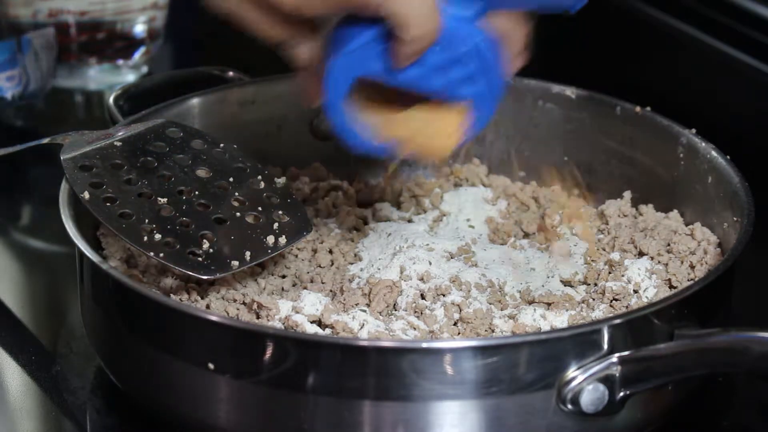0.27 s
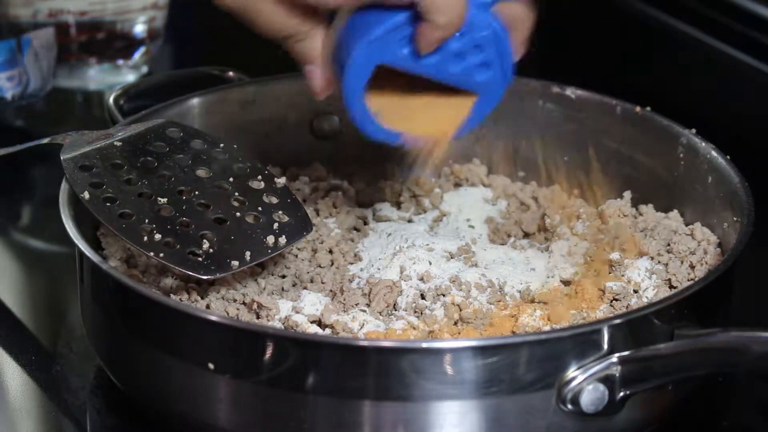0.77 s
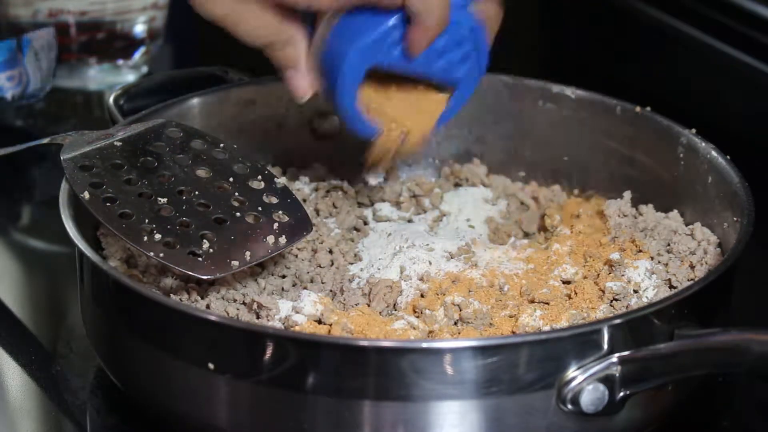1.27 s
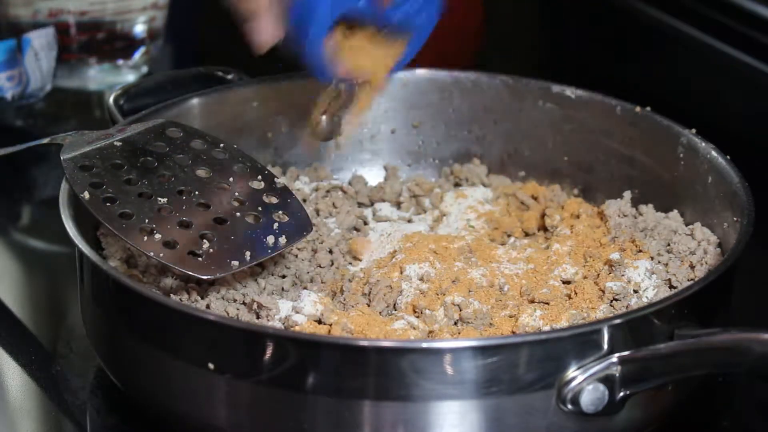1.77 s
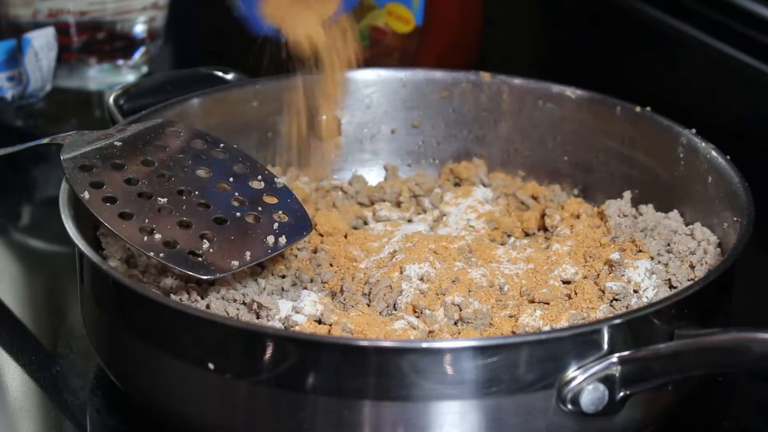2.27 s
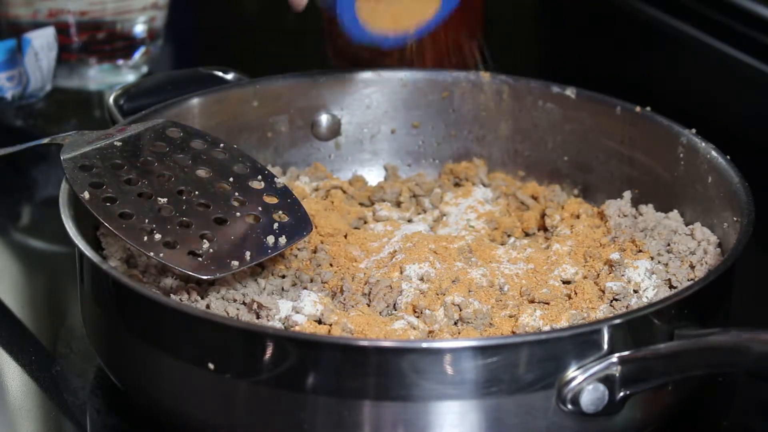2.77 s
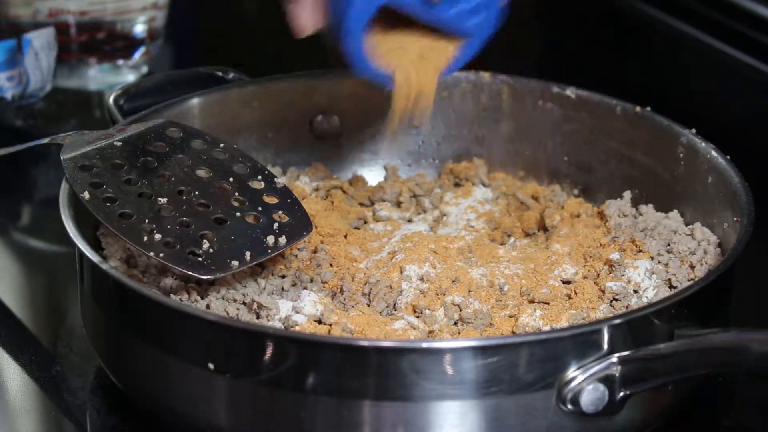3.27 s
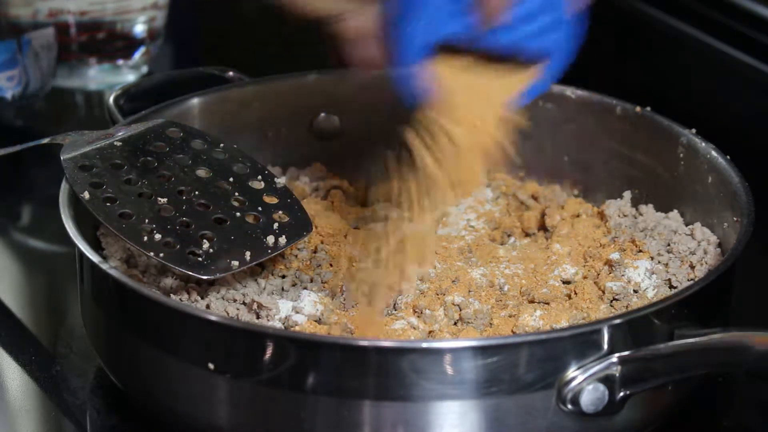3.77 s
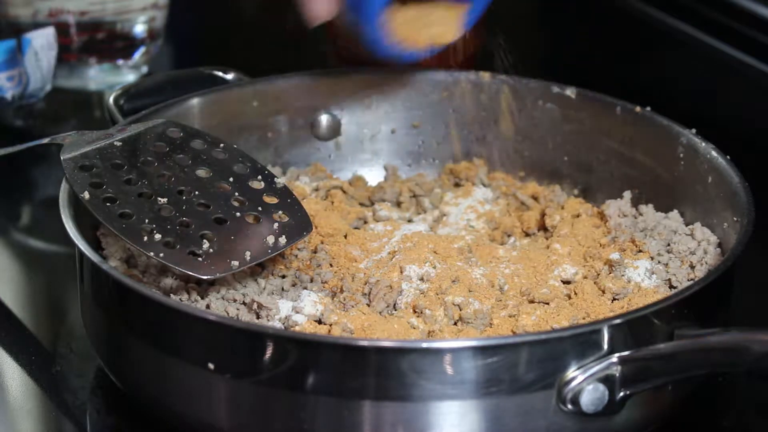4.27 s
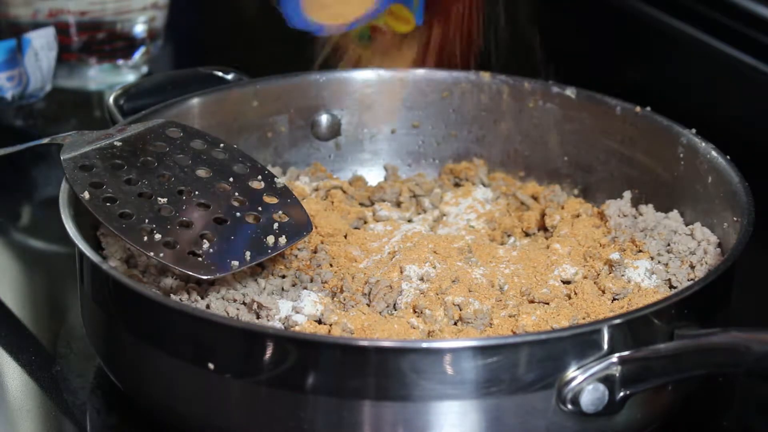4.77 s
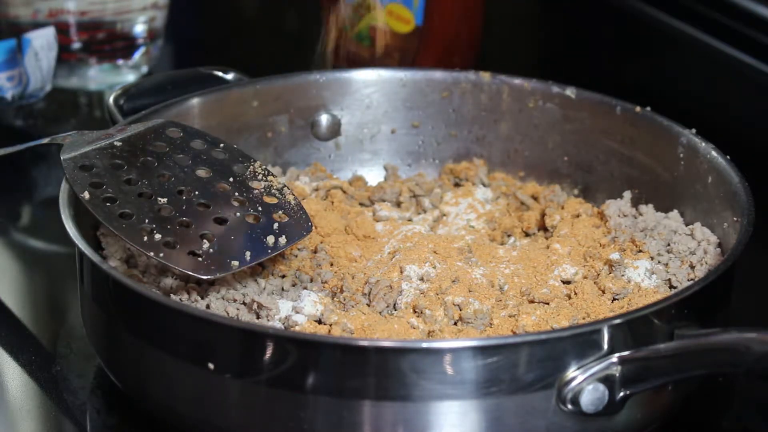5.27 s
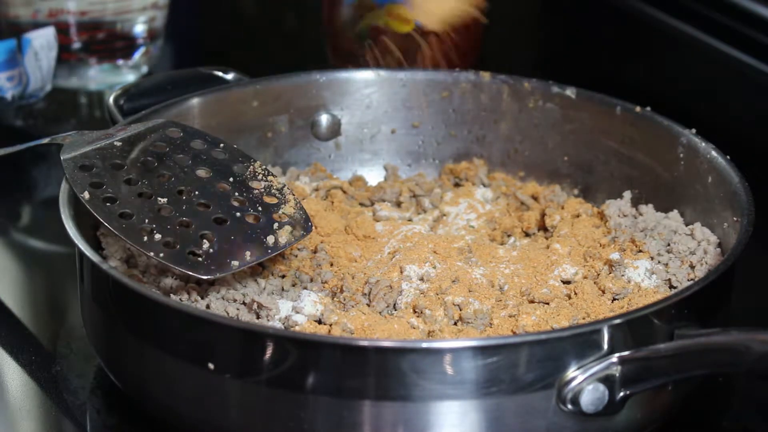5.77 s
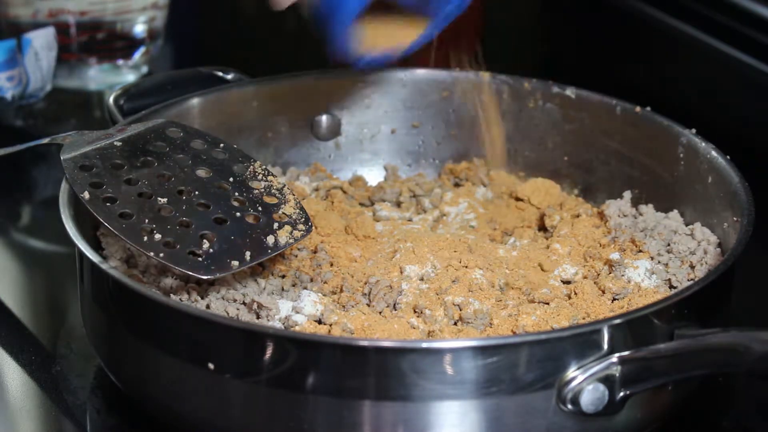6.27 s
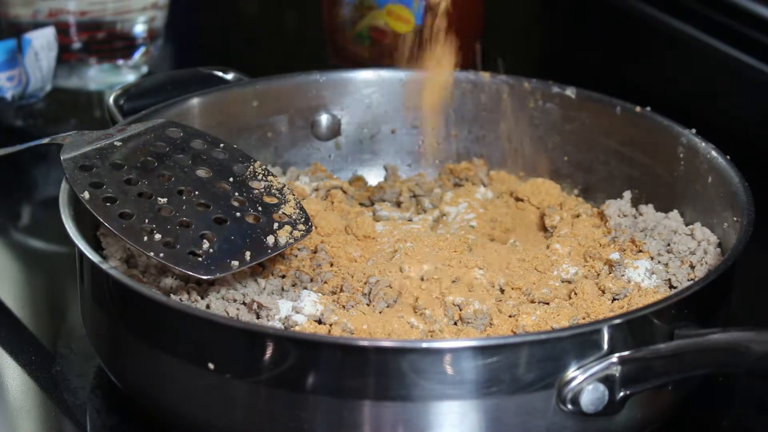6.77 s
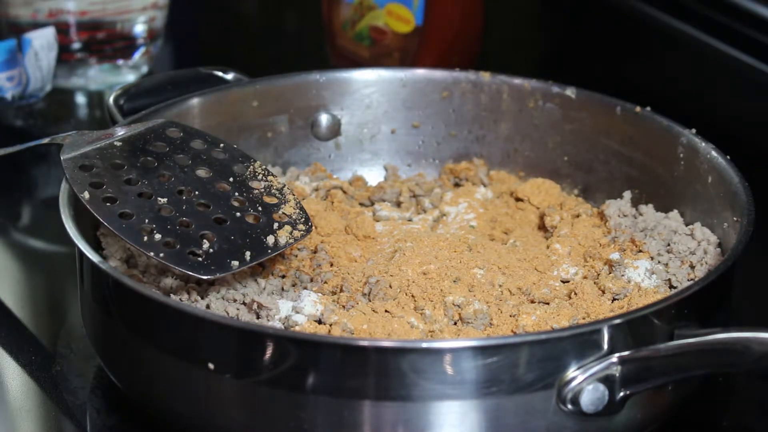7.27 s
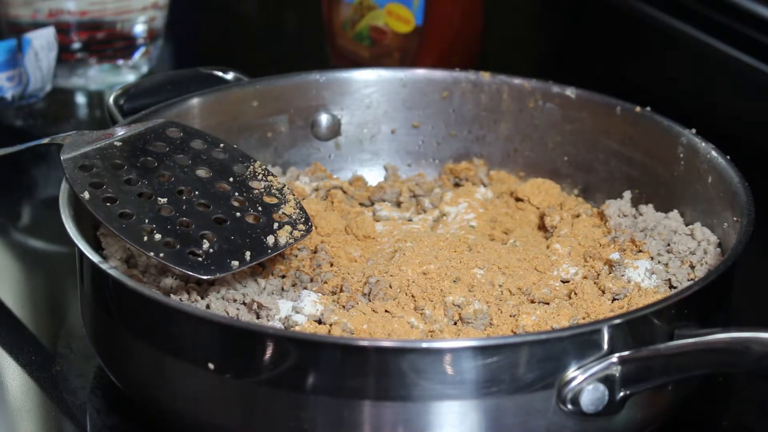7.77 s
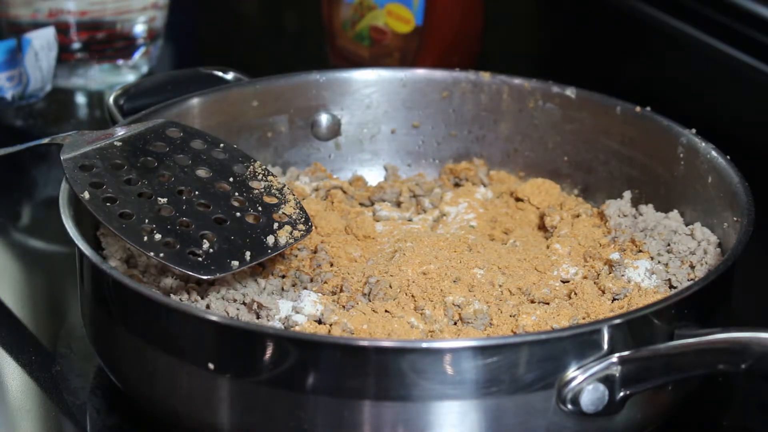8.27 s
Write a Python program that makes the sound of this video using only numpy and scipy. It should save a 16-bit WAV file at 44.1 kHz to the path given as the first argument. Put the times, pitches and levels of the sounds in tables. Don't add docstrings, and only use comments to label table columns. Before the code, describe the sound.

Throughout, a quiet kitchen hums low with slowly beating appliance tones, soft air rumble and faint hiss. It opens with a few hollow finger taps on plastic, and from 0 to 2.3 s a jar of dry powder is flicked about four times a second, each flick a paired swish, out and back, grainy with a fine high fizz. A sharp fingernail knock lands at 1.4 s, small clicks at 2.5 s. After a short lull, shaking resumes from 2.8 to about 6.1 s, gradually softer. From 6.3 to 6.8 s come looser slips of powder and gritty clicks. Between 7.1 and 7.9 s fingers fumble, tapping and scuffing the plastic. At 8.1 s the lid snaps shut with abrupt loud cracks, the pan rings faintly and the background briefly dips. Soft low thuds at 8.2 to 8.5 s set the jar on a hollow counter, amid rubbing. Close microphone, short room echo.

```python
import sys
import numpy as np
from scipy import signal
from scipy.io import wavfile
from scipy.ndimage import uniform_filter1d

SR = 44100
rng = np.random.default_rng(int(sys.argv[2]) if len(sys.argv) > 2 else 0)


def int16_out(signal):
    q = np.round(np.clip(np.atleast_2d(signal).T, -1, 1) * 32767)
    wavfile.write(sys.argv[1], SR, q.astype(np.int16))


def convert_level_to_amplitude(level_db):
    exponent = np.asarray(level_db, float) / 20
    return 10 ** exponent


N = 376173


def evened(x):
    return x / np.sqrt(np.mean(x ** 2) + 1e-20)


def read(points, hz):
    f, value = np.transpose(points)
    return np.interp(np.log(hz + 1), np.log(f + 1), value)


def add(mix, start_s, sound):
    part = mix[round(start_s * SR):][:len(sound)]
    part += sound[:len(part)]


def resonate(x, hz, width_hz):
    q = max(hz / width_hz, .3)
    return signal.lfilter(*signal.iirpeak(min(hz, .45 * SR), q, SR), x)


def resonate_twice(x, hz, width_hz):
    return resonate(resonate(x, hz, width_hz), hz, width_hz)


def ring(modes, seconds, soft_s=0.0009, sag=0):
    t = np.arange(round(seconds * SR)) / SR
    bent = t + sag * 0.019 * (1 - np.exp(-t / 0.017))
    tones = sum(convert_level_to_amplitude(db - 60 * t / t60) * np.sin(2 * np.pi * hz * bent) for hz, db, t60 in modes)
    return (1 - np.exp(-t / soft_s)) * tones


def noise(spectrum, patchy_db, channels=1):
    hz = np.fft.rfftfreq(2048, 1 / SR)
    real, imag, patches = rng.standard_normal((N // 512 + 5, 1025, channels, 3)).T
    patches = uniform_filter1d(patches, 20, 1)
    patches = evened(uniform_filter1d(patches, 6, 2))
    z = (real + 1j * imag) * convert_level_to_amplitude(read(spectrum, hz)[:, None] + patchy_db * patches)
    return evened(signal.istft(z, nperseg=2048, noverlap=1536)[1][:, :N])


# pitch in Hz, rms level in dB, start phase in turns.
HUM_TONES = [(60.0, -56.5, .3), (59.17, -61.5, 0), (120, -67, .1), (118.34, -66, .4), (153.8, -64, .2),
             (205.1, -56, .3), (354.9, -61, .1), (359.9, -64, .7)]


def hum():
    t = np.arange(N) / SR
    return sum(np.sqrt(2) * convert_level_to_amplitude(db) * np.cos(2 * np.pi * (hz * t + turns)) for hz, db, turns in HUM_TONES)


# frequency in Hz, density in dB per Hz.
AIR_SPECTRUM = [(15, -55), (25, -35), (49, 0), (72, -8.5), (87, -32), (110, -11.5), (180, -4.5), (330, -2),
                (480, -4), (680, -8.5), (1000, -10), (1330, -10), (1600, -16), (4500, -25), (16000, -42.5)]


def air():
    return convert_level_to_amplitude(-46.5) * noise(AIR_SPECTRUM, patchy_db=-0.15)[0]


# frequency in Hz, density in dB per Hz.
HISS_SPECTRUM = [(18, -31), (30, -3.5), (1130, -10.5), (1320, -11), (1810, -7), (5310, -7.5), (16000, -8)]


def hiss():
    return convert_level_to_amplitude(-55.5) * noise(HISS_SPECTRUM, patchy_db=1.5, channels=2)


# start in seconds, peak in dB, ring in Hz, rub in dB above the ring.
TAP_EVENTS = [(.017, -35, 480, -17), (.032, -33, 513, -11), (.058, -36, 500, -10), (.096, -34, 510, -16),
              (0.097, -40.5, 1720, -3), (0.601, -43, 2660, -5), (1.41, -38, 550, -9), (2.543, -37, 504, -9),
              (6.276, -41.5, 483, 5), (6.532, -32, 530, -21), (6.71, -42, 1370, 1.5),
              (6.599, -41, 2240, -11), (7.266, -41, 870, 1), (7.27, -38, 1820, -6), (7.331, -43.5, 900, 4),
              (7.401, -36.5, 1090, 2.5), (7.403, -41, 1800, -2.5), (7.485, -39.5, 910, 1),
              (7.487, -28, 1685, -17), (7.55, -35.5, 930, -3), (7.629, -37, 990, 1.5),
              (7.631, -37, 1640, -4), (7.704, -39, 442, -1), (7.803, -35, 1470, -9), (7.92, -41, 1500, -5)]


def taps():
    out, t = np.zeros(N), np.arange(2500) / SR
    t60 = .03
    grits = rng.standard_normal((len(TAP_EVENTS), 2500))
    for (s, db, hz, rub_db), grit in zip(TAP_EVENTS, grits):
        modes = [(hz, -1, t60), (1.15 * hz, -4, 1.3 * t60), (1.33 * hz, -5, 0.078 * t60)]
        rub = evened(resonate_twice(grit, hz, hz)) * convert_level_to_amplitude(rub_db - 60 * t / (2.1 * t60))
        add(out, s, convert_level_to_amplitude(db) * (ring(modes, 2500 / SR) + rub))
    return out


# frequency in Hz, t60 in seconds.
ROOM_T60 = [(300, 1), (1500, 0.38), (4000, 0.42), (9000, 0.35), (15000, 0.32)]


def kitchen(x):
    echoes = np.zeros(SR)
    at = np.arange(200, SR - 20, 20)
    echoes[at + rng.integers(0, 20, len(at))] = rng.choice([-1., 1.], len(at))
    hz, t, z = signal.stft(echoes, SR, nperseg=256)
    decay = convert_level_to_amplitude(-60 * t / read(ROOM_T60, hz)[:, None])
    tail = signal.istft(z * decay, SR, nperseg=256)[1]
    return signal.fftconvolve(x, tail / np.linalg.norm(tail))[:N]


# out stroke in seconds, lag of the return in seconds, out in dB, return in dB.
SHAKE_EVENTS = [(0.037, 0.11, -49.5, -49), (.277, 0.096, -54.5, -56), (.521, .114, -55, -49.5),
                (.772, 0.1, -51, -52), (.999, .096, -53, -47.5), (1.244, 0.1, -55.5, -55.5),
                (1.482, 0.1, -53, -52.5), (1.718, 0.1, -56.5, -54), (1.937, 0.096, -57, -61),
                (2.177, 0.062, -61, -63), (2.804, 0.084, -56.5, -55), (3.03, 0.1, -58.5, -53),
                (3.26, 0.086, -51.5, -54), (3.451, .097, -55, -54), (3.66, 0.12, -54, -52.5),
                (3.913, 0.09, -56.5, -56), (4.125, 0.088, -52.5, -52.5), (4.322, 0.097, -56.5, -54),
                (4.55, 0.091, -59, -51.5), (4.742, 0.12, -58, -57), (4.974, 0.066, -66, -65),
                (5.303, 0.1, -56.5, -65), (5.51, 0.14, -58, -64), (5.747, .142, -55, -72),
                (5.993, .107, -58.5, -60.5)]
# time in seconds, share in dB.
WALL_SHARE = [(0, -2), (.3, 4.5), (.75, -5), (.9, 1), (1.1, -6), (1.3, 2.5), (1.55, -4.5), (2.05, 4),
              (2.85, -9), (3.1, -5.5), (3.35, 1), (3.9, -1.5), (4.2, -2), (4.6, -4), (4.8, -3), (5.3, 2.5),
              (5.75, 0), (6.1, -6)]
# centre in seconds, level in dB, wall share in dB,
# width in seconds.
SLIP_EVENTS = [(.4, -56, 0, 0.11), (1.882, -51, -14, 0.035), (2.56, -58, 0, 0.044), (2.727, -56.5, -4, .08),
               (3.88, -63.5, 10, 0.043), (4.74, -66, 7, .035), (6.04, -62.5, 3, 0.018),
               (6.295, -52.5, -9, 0.038), (6.46, -56, -5, 0.058), (6.505, -58, -4, .05),
               (6.536, -57, -3, .034), (6.625, -51, 3, .05), (6.715, -49, -9, 0.057),
               (6.755, -53.5, -13, .05), (7.083, -56, -8, 0.027), (7.215, -55.5, 1, 0.052),
               (7.269, -57.5, 6.5, 0.039), (7.332, -57.5, 1, 0.044), (7.397, -55, 0, .04),
               (7.565, -57.5, 9, 0.037), (7.62, -58, 0, .05), (7.667, -57, -1, .057), (7.71, -66, -8, .05),
               (7.758, -63, -8, .032), (7.808, -61, 0, .04), (8.07, -56, -6, .031), (8.36, -58.5, 8.5, .04),
               (8.41, -60.5, 10, 0.055)]


def strokes():
    out_width_s, return_width_s = 0.049, 0.055
    return_wall_db = 2.5
    out_s, lag_s, out_db, return_db = np.transpose(SHAKE_EVENTS)
    when, wall_db = np.transpose(WALL_SHARE)
    out = [(s, db, np.interp(s, when, wall_db), out_width_s) for s, db in zip(out_s, out_db)]
    back = [(s, db, np.interp(s, when, wall_db) + return_wall_db, return_width_s)
            for s, db in zip(out_s + lag_s, return_db)]
    return [*out, *back, *SLIP_EVENTS]


def grains(per_s, spread_db):
    hit, size, sign = rng.random((N, 3)).T
    return (hit < per_s / SR) * convert_level_to_amplitude(-spread_db * np.log(size + 0.0092)) * np.sign(sign - .5)


# centre in Hz, width in Hz, level in dB.
HEAP_BODY = [(1500, 3200, 12), (2800, 3900, 6), (4000, 2100, -1.5), (7000, 4300, -23)]
# centre in Hz, width in Hz, level in dB.
JAR_BODY = [(5250, 3800, -8), (5540, 1100, 2), (6640, 6100, -19)]
# centre in Hz, width in Hz, level in dB.
FIZZ_BODY = [(9500, 1900, 8), (10840, 1800, 4.5), (12400, 5000, 6)]


def rustle(body, per_s, trim_db):
    powder = grains(per_s, spread_db=4.0)
    colour = sum(convert_level_to_amplitude(db) * resonate_twice(powder, hz, 1.34 * width_hz) for hz, width_hz, db in body)
    return convert_level_to_amplitude(trim_db) * evened(colour)


def shaking():
    t = np.arange(0, N, 32) / SR
    lean = 0.83
    power = 1e-10
    for s, db, wall_db, width_s in strokes():
        u = (t - s) / width_s
        rush = np.exp(-2.8 * np.where(u < 0, u / lean, u) ** 2)
        fizz_db = -4.5 + 0.81 * wall_db
        power = power + rush * convert_level_to_amplitude(2 * (db + np.array([[0], [wall_db], [fizz_db]])))
    heap, jar, fizz = [np.interp(np.arange(N) / SR, t, level) for level in np.sqrt(power)]
    out = heap * rustle(HEAP_BODY, per_s=4000, trim_db=1.5)
    out += jar * rustle(JAR_BODY, per_s=3500, trim_db=-2.5)
    return out + fizz * rustle(FIZZ_BODY, per_s=4000, trim_db=.3)


def bursts(rows, rise_s, spread):
    out, t = np.zeros(N), np.arange(9000) / SR
    for (s, db, hz, t60), grit in zip(rows, rng.standard_normal((len(rows), 9000))):
        burst = evened(resonate_twice(grit, hz, spread * hz))
        add(out, s, burst * convert_level_to_amplitude(db - 60 * t / t60) * np.minimum(t / rise_s, 1))
    return out


# start in seconds, starting rms in dB, centre in Hz, t60 in seconds.
CLICK_EVENTS = [(.361, -41, 6000, .04), (1.409, -42, 6000, 0.023), (2.543, -40.5, 6000, 0.047),
                (2.544, -46, 2500, .03), (2.605, -44, 8000, .015), (2.68, -47.5, 5000, .04),
                (3.063, -44, 3500, 0.024), (4.548, -42.5, 4000, .03), (4.733, -47, 12000, .08),
                (6.275, -36, 2300, .022), (6.276, -45, 6000, .036), (6.508, -45, 5000, 0.027),
                (6.532, -39.5, 2500, .027), (6.533, -41.5, 6500, 0.036), (6.599, -45, 6000, .04),
                (6.7105, -33, 3300, .02), (7.074, -49, 4000, .04), (7.396, -42, 4500, .027),
                (7.4, -44, 2100, 0.027), (7.486, -51, 2200, 0.027), (7.551, -46, 5000, .04),
                (7.664, -37.5, 9500, .012), (7.669, -42, 10000, .043), (7.703, -39, 3500, .013),
                (7.755, -38.5, 3500, .018), (7.803, -40, 2200, .02), (8.278, -40, 9000, .012),
                (8.298, -37, 9500, .012), (8.311, -42, 8000, .012)]


def clicks():
    return bursts(CLICK_EVENTS, rise_s=0.00083, spread=1.15)


# start in seconds, peak in dB.
NAIL_KNOCK = (1.4097, -18)
# pitch in Hz, level in dB, t60 in seconds.
SHELL_MODES = [(1685, 0, .021), (1960, 3, .009), (2300, -3, .007)]


def nail_knock():
    out = np.zeros(N)
    start_s, peak_db = NAIL_KNOCK
    add(out, start_s, convert_level_to_amplitude(peak_db) * ring(SHELL_MODES, .06))
    return out


# start in seconds, starting rms in dB, centre in Hz, t60 in seconds.
SCUFF_EVENTS = [(1.42, -47.5, 1900, 0.18), (7.165, -40, 350, 0.12), (7.37, -38, 350, 0.2),
                (7.27, -50, 1500, 0.96), (7.402, -46.5, 1390, .65), (7.49, -42, 1370, .38),
                (7.555, -48.5, 1300, .61), (7.635, -45.5, 1500, 1), (8.06, -45, 1300, .3),
                (8.345, -42, 746, 0.85), (8.377, -42.5, 1800, .99), (8.45, -42.5, 1000, .8)]


def scuffs():
    return bursts(SCUFF_EVENTS, rise_s=0.017, spread=1.37)


# start in seconds, blow in dB, burst t60 in seconds, tilt in dB per octave,
# low thud in dB.
SNAP_EVENTS = [
    (8.0966, 10, .011, .8, 1.5),
    (8.0986, 5.5, .01, -.3, 1.5),
    (8.1049, -1.5, .043, -2, -3),
    (8.1311, 11.5, .009, .3, -10),
]
# centre in Hz, width in Hz, level in dB.
LID_MODES = [(380, 180, -1), (700, 340, -1.5), (1180, 170, 1.5), (1550, 450, 2.5), (2140, 720, 3),
             (2710, 710, 4), (3500, 1020, 3), (5500, 910, -2.5), (7550, 2700, -10), (12200, 8300, -26)]


def lid():
    out, t = np.zeros((2, N)), np.arange(3000) / SR
    cracks = rng.standard_normal((len(SNAP_EVENTS), 3000))
    for (s, db, t60, tilt_db, thud_db), crack in zip(SNAP_EVENTS, cracks):
        push = 1. * (t == 0)
        direct = (crack + 1.35 * push) * convert_level_to_amplitude(-60 * t / t60)
        for heard, drive in zip(out, (direct, push)):
            blow = 0
            for k, (hz, width_hz, mode_db) in enumerate(LID_MODES):
                gain = convert_level_to_amplitude(mode_db + tilt_db * np.log2(hz / 3000) + thud_db * (hz < 900))
                blow = blow + (-1) ** k * gain * resonate(drive, hz, width_hz)
            add(heard, s, convert_level_to_amplitude(db) * 0.098 * evened(blow))
    return out


# pitch in Hz, level in dB, t60 in seconds.
PAN_MODES = [(1550, -4, 0.36), (1512, 2, 0.38), (1541, 0.5, 0.38), (1520, 2, 0.43), (1633, -1, 0.42),
             (1945, -4, .35), (3030, -7, 0.29), (3300, -9, 0.37), (3620, -3, 0.4), (3830, -3, 0.42)]


def pan():
    out = np.zeros(N)
    for s, db, *_ in SNAP_EVENTS:
        add(out, s, convert_level_to_amplitude(db - 35.0) * ring(PAN_MODES, .43, soft_s=0.0037))
    return out


# start in seconds, level in dB.
SETDOWN_EVENTS = [
    (8.2, -40.5),
    (8.374, -35),
    (8.447, -40),
    (8.495, -43),
]
# pitch in Hz, level in dB, t60 in seconds.
COUNTER_MODES = [(104, 3, 0.28), (137, -4, 0.21), (208.4, 1, 0.27), (266, 0, 0.12), (514, -3, 0.11)]


def counter():
    out = np.zeros(N)
    for s, db in SETDOWN_EVENTS:
        add(out, s, convert_level_to_amplitude(db) * ring(COUNTER_MODES, .4, soft_s=0.0089, sag=0.19))
    return out


def scene():
    powder = shaking()
    knocks = taps() + clicks() + nail_knock()
    snap, push = lid()
    sent = convert_level_to_amplitude(-11) * powder + convert_level_to_amplitude(-9) * knocks + convert_level_to_amplitude(-9) * push
    wet = kitchen(signal.lfilter(*signal.butter(3, 950, "high", fs=SR), sent))
    mono = hum() + air() + knocks + powder + scuffs() + snap + pan() + counter() + wet
    return np.array([mono, mono])


def roll_off(x):
    return signal.sosfilt(signal.butter(12, 16610, fs=SR, output="sos"), x)


def record(dry):
    x = dry + hiss()
    edge_hz, recovery_db_per_s, threshold_db = 15740, 100., -20
    band_limit = signal.firwin(1001, edge_hz, window=("kaiser", 9), fs=SR)
    x = signal.oaconvolve(x, band_limit[None], "same")
    power = signal.lfilter([.004], [1, -.996], x[0] ** 2)
    power_db = 10 * np.log10(abs(power) + 1e-12)
    power_db = np.minimum(power_db, -8)
    fall_db = np.arange(N) * recovery_db_per_s / SR
    held_db = np.maximum.accumulate(power_db + fall_db) - fall_db
    over_db = np.maximum(held_db - threshold_db, 0)
    x = x / convert_level_to_amplitude(.85 * over_db)
    x = x * np.minimum(np.arange(N) / (0.00094 * SR), 1)
    mix = np.clip(x, -.99, .99)
    return roll_off(mix)


dry = scene()
out = record(dry)
int16_out(out)
```